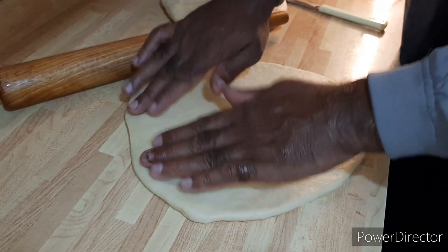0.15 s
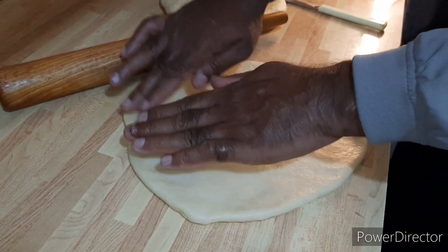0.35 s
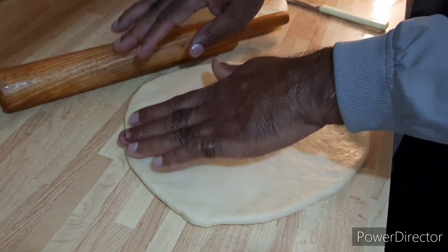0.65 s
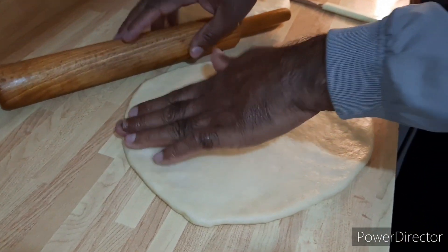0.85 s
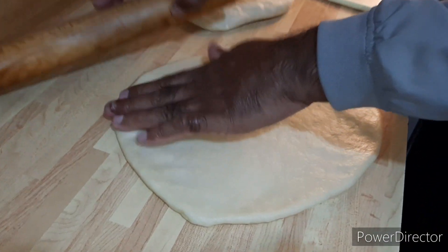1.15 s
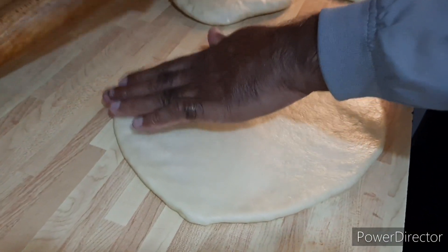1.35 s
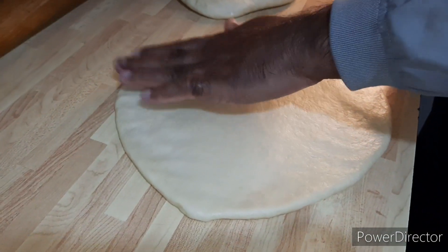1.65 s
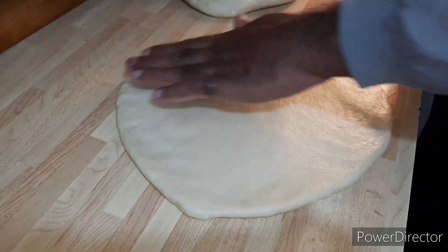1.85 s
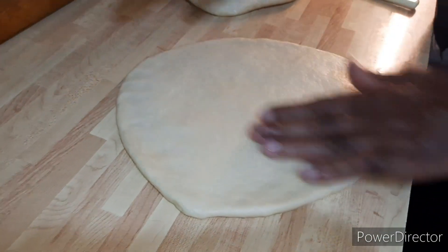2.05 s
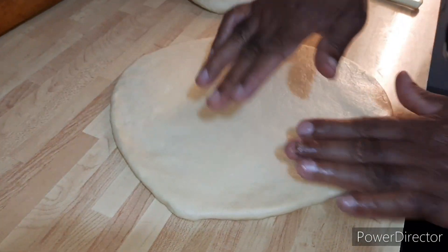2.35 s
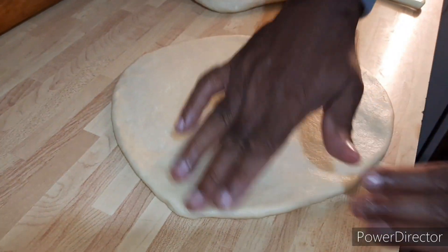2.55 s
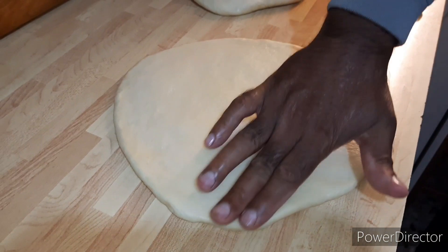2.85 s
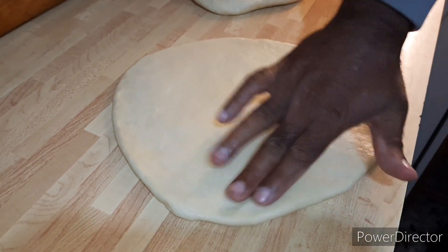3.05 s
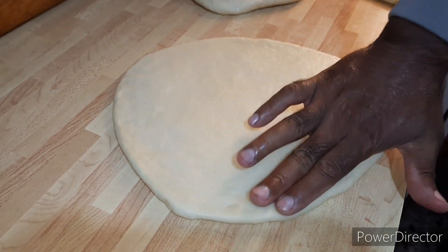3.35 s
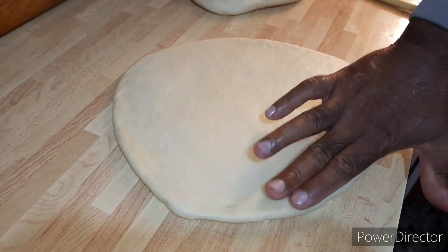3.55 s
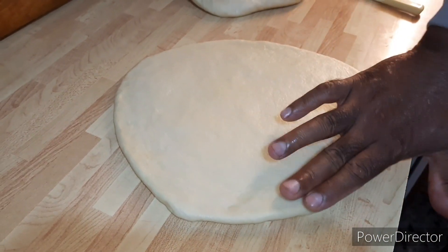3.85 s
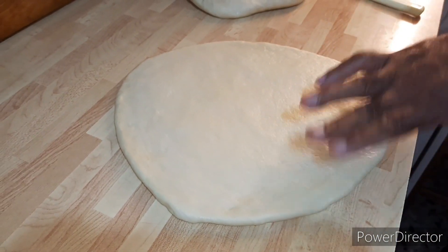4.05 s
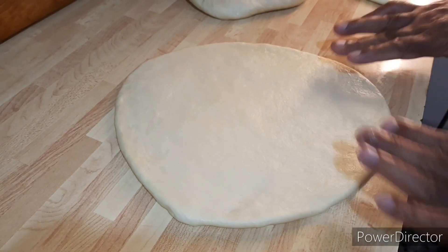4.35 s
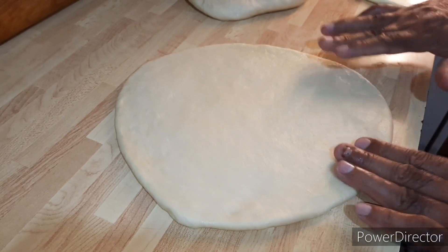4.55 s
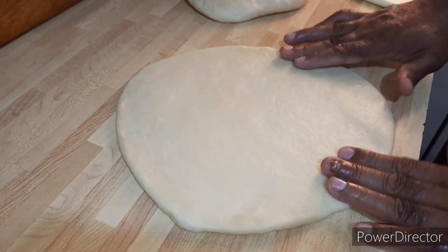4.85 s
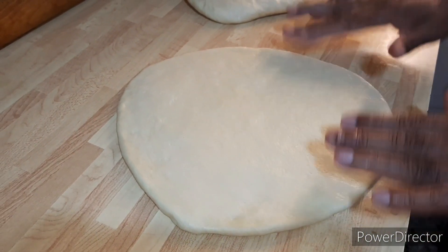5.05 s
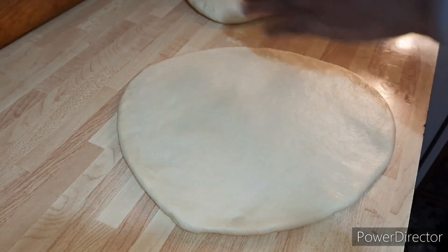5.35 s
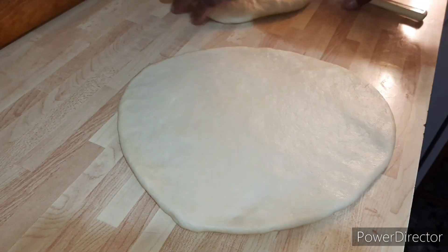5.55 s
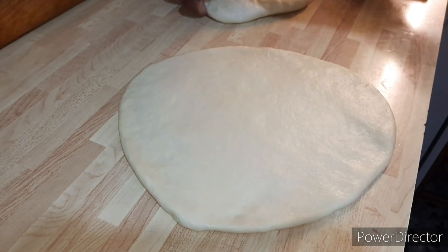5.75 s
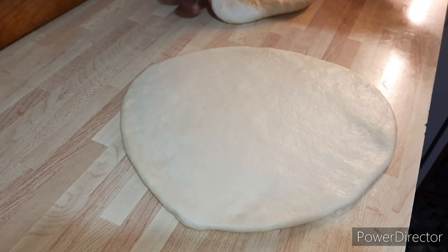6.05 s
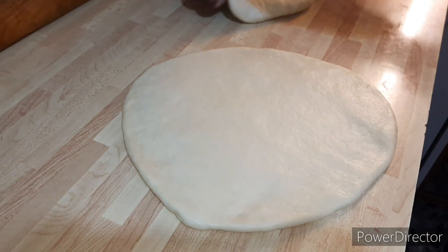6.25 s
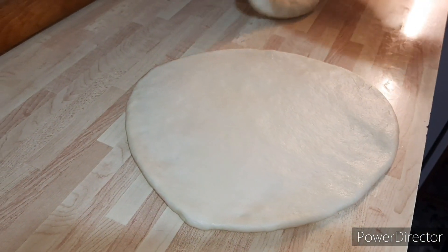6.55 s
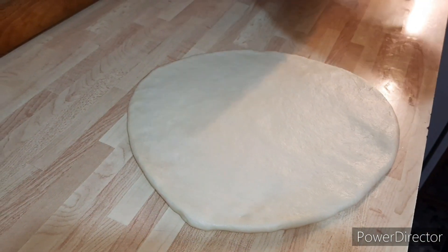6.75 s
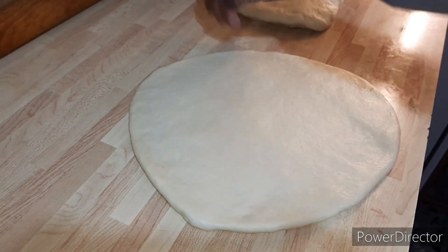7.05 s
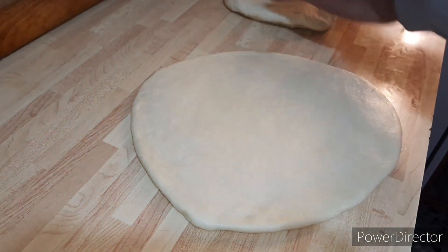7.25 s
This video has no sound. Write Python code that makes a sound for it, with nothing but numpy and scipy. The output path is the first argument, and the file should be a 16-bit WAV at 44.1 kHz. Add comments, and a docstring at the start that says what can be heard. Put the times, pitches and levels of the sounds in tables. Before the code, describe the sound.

Low, hollow pats and fine, dry skin slides on dough, heard near the counter over a faint steady room hush. A rolling pin and other hard things clack on the wood early on. After a calm middle come three heavier pats, louder swishing, a short wooden drag, and a sharp thump close to the end, with slight room echo.

```python
"""Hands pat and smooth a sheet of dough on a hollow wooden counter in a kitchen, heard close by.
Soft pats are long pushes that ring the counter's low modes; skin slides are a dry, flickering noise hiss.
A rolling pin and other things knock and drag on the wood: short blows or small catches ring its modes.
The room answers pats and knocks with sparse echoes, over a steady kitchen hush."""
import sys
import numpy as np
from scipy import signal
from scipy.fft import rfft, irfft, next_fast_len
from scipy.io import wavfile
from scipy.ndimage import uniform_filter1d

SR = 44100
rng = np.random.default_rng(int(sys.argv[2]) if len(sys.argv) > 2 else 0)


def log_audio(samples):
    """Write samples as a 16-bit WAV file to the path given in sys.argv[1]."""
    # one column per channel
    frames = np.atleast_2d(samples).T
    # limit to full scale, then quantise
    limited = np.clip(frames, -1, 1)
    pcm = np.round(limited * 32767).astype(np.int16)
    wavfile.write(sys.argv[1], SR, pcm)


N = 325899

# modes of the hollow counter, struck and left free, before any tilt: f/Hz, level/dB, t60/s
COUNTER_MODES = [(56.7, -15, .3), (89, -1, 0.34), (113.05, -8, 0.51), (126.3, 5.5, 0.15),
                 (140.2, -15.5, 0.6), (180.5, 1.5, 0.19), (246, -1.5, 0.14), (309.5, 1.5, 0.18),
                 (327.8, 1.5, 0.15), (377.4, -6.5, 0.29), (416.3, -3.5, 0.23), (468.5, 2.5, 0.11),
                 (600.3, -6, 0.17), (707, 1, .1), (796, -12, 0.13), (863, -9, 0.27), (1054, -8.5, 0.18)]
# modes of the rolling pin: f/Hz, level/dB, t60/s
PIN_MODES = [(1542, -2, .1), (1592, 0, .09), (1685, -9, .06), (2261, -9, .06), (3700, -14, .04),
             (6400, -14, .03)]


def gain_of(db):
    """Amplitude factor of a level in dB."""
    return 10 ** (np.asarray(db) / 20)


def evened(x):
    """Scale to an RMS of one."""
    return x / np.sqrt(np.mean(x ** 2) + 1e-20)


def peaked(x):
    """Scale to a peak of one."""
    return x / abs(x).max()


def read(points, hz):
    """Read a frequency curve, interpolated along log frequency."""
    f, value = np.transpose(points)
    return np.interp(np.log(hz + 1), np.log(f + 1), value)


def add(mix, s, sound):
    """Mix a sound in at s seconds, cut off at the end."""
    part = mix[..., round(s * SR):][..., :sound.shape[-1]]
    part += sound[..., :part.shape[-1]]


def ring(modes, weight_db, crowd):
    """Dying sines that build up within a cycle; crowd splits each mode into three, wider higher up."""
    hz, db, t60 = np.repeat(modes, 3, axis=0).T[:, :, None]
    t = np.arange(SR // 3) / SR
    spread = crowd * np.clip(np.log2(hz / 150), 0, 1)
    near = 1 + spread * rng.standard_normal(hz.shape)
    build = 1 - np.exp(-t * hz / 0.25)
    decay = gain_of(db + weight_db(hz) - 60 * t / t60)
    return (build * decay * np.sin(2 * np.pi * hz * near * t)).sum(0)


def blow(body, contact_ms):
    """A longer contact is a softer push and leaves out the high modes."""
    push = signal.windows.hann(max(round(contact_ms * SR / 1000), 3) + 2)
    return peaked(signal.oaconvolve(body, push))


def hiss(shape_db, patchy_db, size):
    """Random short-time spectra for two ports; shape_db(hz, s) sets the colour over time."""
    # likeness of left and right: f/Hz, correlation (0 to 1)
    likeness = [(60, 1), (300, 0.84), (700, 0.23), (2000, 0.067), (6000, 0.073), (14000, 0.073)]
    frames, hz = 4 * N // size + 5, np.fft.rfftfreq(size, 1 / SR)
    a, b, c, d, patches = rng.standard_normal((frames, len(hz), 5)).T
    # random level patches, smoothed over frequency and then time
    patches = uniform_filter1d(patches, size=size // 64, axis=0)
    patches = evened(uniform_filter1d(patches, size=8192 // size, axis=1))
    same = np.clip(read(likeness, hz), -1, 1)[:, None]
    left = a + 1j * b
    right = same * left + np.sqrt(1 - same ** 2) * (c + 1j * d)
    frame_s = np.arange(frames) * size / 4 / SR
    spectra = np.array([left, right]) * gain_of(shape_db(hz[:, None], frame_s) + patchy_db * patches)
    return evened(signal.istft(spectra, nperseg=size, noverlap=3 * size // 4)[1][:, :N])


def hush():
    """The steady background of the kitchen: coloured noise with mild random patches."""
    # colour of the background: f/Hz, density/dB per Hz
    hush_colour = [(18, -47.5), (30, -27.5), (169, -10.5), (203, -14.5), (237, 1), (263, -35.5), (308, 0.5),
                   (370, -9), (1200, -17), (1370, -35.5), (2080, -19), (2770, -28), (3420, -33.5),
                   (12300, -32.5), (15600, -34)]
    level_db = -63
    return gain_of(level_db) * hiss(lambda hz, at: read(hush_colour, hz) + 0 * at, patchy_db=2.5, size=1024)


def stroke(t, touch, swell, fade, db):
    """Gain of one slide: sets in, swells to its peak, then fades as the hand lifts."""
    swell_db, fade_db = 7, 14.5  # rise over the swell time, fall over each fade time
    onset_s = 0.0066 + .15 * swell
    peak = touch + swell
    shape_db = np.where(t < peak, swell_db * (t - peak) / swell, fade_db * (peak - t) / fade)
    return gain_of(db + shape_db) * np.clip((t - touch) / onset_s, 0, 1)


def scraping():
    """Small catches of hands and tools shake the counter, damped by touch; the dragged pin sings a little."""
    # level of the catches that shake the wood: t/s, level/dB
    scrape_level = [(0.0, -54), (0.39, -51.5), (0.93, -53), (1.4, -48.5), (1.68, -55.5), (1.82, -43),
                    (2.2, -63), (2.5, -60.5), (3.09, -55.5), (3.43, -59.5), (3.68, -55), (4.13, -68.5),
                    (4.76, -54), (5.2, -63), (5.66, -64), (5.74, -50.5), (5.83, -51.5), (5.89, -44),
                    (5.96, -41.5), (6.0, -59), (6.08, -47.5), (6.25, -58.5), (6.63, -59), (6.88, -66),
                    (7.1, -79), (7.226, -50), (7.39, -52)]
    # the pin is dragged: touch t/s, swell/s, fade/s
    pin_drag = (5.855, .025, .09)
    pin_drag_db = -43
    catches_per_s, touch_damping = 1500, .25  # the damping scales each t60

    strength = gain_of(1.1 * np.minimum(rng.exponential(1, (2, N)), 5))
    sign = rng.choice([-1, 1], (2, N))
    catches = strength * sign * (rng.random((2, N)) < catches_per_s / SR)
    catches[1] = 0.96 * catches[0] + 0.88 * catches[1]  # right partly shares the left's catches

    damped = [(hz, db, touch_damping * t60) for hz, db, t60 in COUNTER_MODES]
    wood = ring(damped, lambda hz: 3.7 * np.log2(hz / 300), crowd=0.078)
    pin = ring(PIN_MODES, np.zeros_like, 0)
    t = np.arange(N) / SR
    wood_level = gain_of(np.interp(t, *np.transpose(scrape_level)))
    pin_level = stroke(t, *pin_drag, pin_drag_db)
    out = 0
    for body, level in ((wood, wood_level), (pin, pin_level)):
        pressed = evened(catches) * level
        out = out + signal.oaconvolve(pressed, body[None] / np.linalg.norm(body), axes=1)[:, :N]
    return out


def rubbing():
    """Skin on floured dough and wood: a fine hiss whose grip flickers; the loudest stroke leads the colour."""
    # skin slides: touch t/s, swell/s, fade/s, peak level/dB, brightness/dB per octave
    slides = [(0.06, 0.019, 0.056, -67.5, 2.5), (0.148, 0.028, .13, -59, -1), (0.297, 0.025, .12, -57, -3),
              (0.44, 0.035, 0.22, -58.5, -3), (0.595, .05, 0.11, -60, -2.5), (0.872, .04, 0.052, -59, -1),
              (1.31, .04, 0.41, -62.5, -7), (1.46, 0.069, .15, -57.5, -3.5), (1.9, .08, 0.14, -54, -4),
              (2.06, 0.22, .12, -59.5, -5), (2.42, 0.63, 0.32, -65, -6), (2.87, .055, .07, -59, -11),
              (4.18, .24, 0.24, -53.5, -4), (4.44, .065, 0.12, -52.5, -6.5), (4.733, .06, 0.07, -56.5, -4),
              (4.88, 0.039, 0.53, -60, 0), (5.218, 0.28, 0.38, -49, -2.5), (5.698, 0.22, 0.11, -47, -2),
              (6.019, 0.11, 0.075, -47, 3.1), (6.258, 0.45, 0.082, -44, 2.5)]
    # faint hiss between the slides: t/s, level/dB
    stir = [(0, -70), (1.2, -66), (2.9, -61), (3.25, -83), (4.0, -91), (4.25, -67), (6.8, -63), (7.05, -69),
            (7.39, -59.5)]
    # colour of the skin hiss before brightness: f/Hz, density/dB per Hz
    skin_colour = [(820, -3), (1400, -0.5), (2270, 2.5), (3170, -1), (3370, -1), (5250, -0.5), (6110, 1),
                   (7170, 0), (9330, -2), (12100, 3), (14800, 2), (15600, -29.5)]
    stir_bright_db, flicker_db = -2, 0.98  # per octave; RMS

    t = np.arange(0, N + 64, 64) / SR
    gains = [stroke(t, *row[:4]) for row in slides]
    gains.append(gain_of(np.interp(t, *np.transpose(stir))))
    power = np.array(gains) ** 2
    # brightness is averaged by power
    bright_db = np.array([row[4] for row in slides] + [stir_bright_db]) @ power / power.sum(0)

    def colour_db(hz, at):
        """Skin colour tilted by the brightness, the tilt held flat below 3 kHz."""
        octaves = np.log2(np.maximum(hz, 3000) / 10000)
        return read(skin_colour, hz) + np.interp(at, t, bright_db) * octaves

    skin = hiss(colour_db, patchy_db=1.0, size=512)
    skin *= gain_of(flicker_db * evened(uniform_filter1d(rng.standard_normal(N), size=200)))
    return np.interp(np.arange(N) / SR, t, np.sqrt(power.sum(0))) * skin


def pats():
    """Fingers and then the heel of the hand land as soft pushes on the counter."""
    # hands on the dough: t/s, finger peak/dB, contact/ms, tilt of the modes at that spot/dB per octave
    hand_pats = [(0.004, -35, 7.4, 5), (0.148, -29, 12.7, 2.5), (0.313, -32, 4.8, 4.5),
                 (0.439, -29.5, 11.2, -7), (0.603, -34, 12, 9), (0.88, -40, 7.6, 4),
                 (0.911, -32.5, 9.2, -3), (1.141, -26, 5.8, 5), (1.197, -31, 7.2, 8),
                 (1.313, -22, 6.6, 2.5), (1.476, -30.5, 7.6, 6), (1.721, -33, 12, -2),
                 (2.846, -39.5, 9.4, -9), (3.117, -36, 9.8, -5.5), (3.296, -39.5, 7.1, -2.5),
                 (3.548, -32, 9.3, -5.5), (3.708, -30, 9, 1), (3.856, -29.5, 10.1, 1.5),
                 (4.468, -42, 5.2, 1.5), (4.523, -20.5, 6.9, -1), (4.708, -32.5, 8.6, 3),
                 (4.731, -19, 7.2, 3), (4.885, -19.5, 7.8, 3.5), (5.718, -46.5, 6.3, 5.5),
                 (6.152, -47, 2.7, -6), (6.739, -46.5, 6.4, 1.5), (7.161, -19.5, 3.55, 6.5),
                 (7.36, -28, 8.3, 10)]
    heel_ms, heel_share = 24.3, 0.32  # delay after the fingers, amplitude relative to them
    out = np.zeros(N)
    for s, db, contact_ms, tilt_db in hand_pats:
        wood = ring(COUNTER_MODES, lambda hz: tilt_db * np.log2(hz / 100), crowd=0.011)
        thud = -gain_of(db) * blow(wood, contact_ms)
        add(out, s, thud)
        add(out, s + heel_ms / 1000, heel_share * thud)
    return out


def kitchen(x):
    """Sparse taps of random sign, one in every 20 samples, each band dying at its own speed."""
    # decay of the room: f/Hz, t60/s
    room_decay = [(100, 0.13), (500, 0.45), (1500, 0.34), (4000, 0.36), (10000, 0.21)]
    taps = np.zeros((2, SR))
    at = np.arange(200, SR - 20, 20) + rng.integers(0, 20, (2, (SR - 201) // 20))
    np.put_along_axis(taps, at, rng.choice([-1., 1.], at.shape), 1)
    hz, t, spectra = signal.stft(taps, SR, nperseg=256)
    weak_bass = hz / (hz + 500)  # the low modes radiate little into the room
    decay = gain_of(-60 * t / read(room_decay, hz)[:, None])
    tail = signal.istft(spectra * weak_bass[:, None] * decay, SR, nperseg=256)[1]
    return signal.fftconvolve(x, tail / np.linalg.norm(tail[0]), axes=1)[:, :N]


def clatter(treble_db):
    """A sharp tick and a noise burst at the contact, with the dense upper ring of the wood dying after it."""
    # colour of the clatter before the treble tilt: f/Hz, density/dB per Hz
    clatter_colour = [(290, -29.5), (500, -16), (770, -2), (1350, -6.5), (1560, -9), (1800, -9), (2400, -8),
                      (3300, -13.5), (4600, -19), (6400, -14), (9000, -28), (12200, -19.5), (15000, -24),
                      (16000, -51)]
    size = SR // 2
    t, hz = np.arange(size) / SR, np.fft.rfftfreq(size, 1 / SR)
    colour_db = read(clatter_colour, hz) + treble_db * np.log2(np.maximum(hz, 2500) / 2500)
    noise = irfft(rfft(rng.standard_normal(size)) * gain_of(colour_db), size)
    tick, burst, tail = (gain_of(-60 * t / t60) for t60 in (.008, .04, .25))
    return peaked(noise * (0.17 * tick + burst + 0.17 * tail))


def knocks():
    """A short blow rings the counter and the pin, and clatters."""
    # hard things meeting the wood: t/s, peak of the wood/dB, contact/ms, weight of modes below 140 Hz/dB,
    # pin ring re wood/dB, clatter re wood/dB, clatter treble tilt/dB per octave
    hard_knocks = [(1.124, -34.5, 2.2, -19, -29, 9, -8.5), (1.135, -30.5, 0.48, -8, -2, 9.5, -31),
                   (1.25, -32, 0.46, -17, -4, -2.5, -24), (1.259, -29.5, 1.2, -43, -29, -1.5, -11.5),
                   (1.648, -14, 1.46, -21, -28, -15.5, -28), (1.68, -35.5, 0.86, -28.5, 0.5, -9, -9.5),
                   (1.702, -20, 1.6, -4, -22, -22.5, 1), (1.7837, -2.5, 0.98, -10, -10, -6, -10.5),
                   (1.812, -31, 0.98, -12, -34, 11.5, -4.5), (1.893, -28, 1.8, -2, -25, -11, -4),
                   (2.049, -20, 1.44, -26, -7, -4, -4), (2.068, -23.5, 1.27, -12, -30, -5, -2.5),
                   (2.882, -48.5, 0.42, -2, -43, 2, -9), (2.909, -49, 1.8, -7, -25, -4.5, 13),
                   (3.473, -54, 1.3, -2, -30, 0, 4), (3.803, -41.5, 1.7, -5, -37, -13, 8),
                   (4.726, -34, 0.64, 10, -26, -4, -0.5), (4.878, -38, 1.4, 21, -25, -6.5, 2.5),
                   (5.945, -32.5, 0.58, -9, -35, -2.5, -8), (5.962, -40.5, 1.7, -4, -35, -19, -10),
                   (7.07, -23.5, 0.43, -14, -10, 1, 3.5), (7.081, -4, 1.83, -1.5, -18, -2, 1),
                   (7.084, -8.5, 1.73, -2, -31, -5.5, -3), (7.1, -14, 0.47, -19, -23, -18, -27)]
    out = np.zeros(N)
    for s, db, contact_ms, deep_db, pin_db, clatter_db, treble_db in hard_knocks:
        wood = blow(ring(COUNTER_MODES, lambda hz: deep_db * (hz < 140), crowd=.06), contact_ms)
        pin = peaked(ring(PIN_MODES, np.zeros_like, 0))
        for part in (-wood, gain_of(pin_db) * pin, gain_of(clatter_db) * clatter(treble_db)):
            add(out, s, gain_of(db) * part)
    return out


def scene():
    """Pats and knocks excite the room; rubbing, scraping and hush are added dry."""
    blows = np.tile(pats() + knocks(), (2, 1))
    return blows + gain_of(-2.5) * kitchen(blows) + rubbing() + scraping() + hush()


def record(dry):
    """Two ports: they differ in level by band, the left later in the treble; bass cut, then band limit."""
    # left level over right: f/Hz, level/dB
    louder_left = [(60, 1.5), (500, 3.5), (2400, 7), (4400, -1.5), (8000, 0), (15000, 3.5)]
    # the left port is farther; the bass comes through the body to both at once
    port_lag_ms, lag_from_hz = 0.5145, 940
    bass_cut_hz, edge_hz = 52, 16400
    size = next_fast_len(N + 4096)
    hz = np.fft.rfftfreq(size, 1 / SR)
    lagging = hz ** 4 / (hz ** 4 + lag_from_hz ** 4)
    lag = np.exp(-2j * np.pi * hz * port_lag_ms / 1000 * lagging)
    half = gain_of(read(louder_left, hz) / 2)  # half the difference goes to each port
    ports = irfft(rfft(dry, size) * np.array([half * lag, 1 / half]), size)[:, :N]
    ports = signal.sosfilt(signal.butter(4, bass_cut_hz, "high", fs=SR, output="sos"), ports)
    band_limit = signal.firwin(511, edge_hz, window=("kaiser", 9), fs=SR)
    return signal.oaconvolve(ports, band_limit[None], "same")


dry = scene()
out = record(dry)
log_audio(out)
```